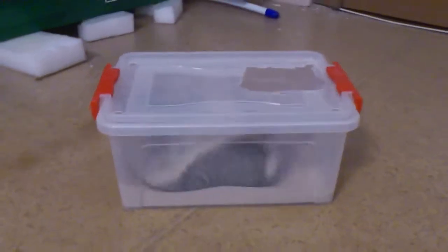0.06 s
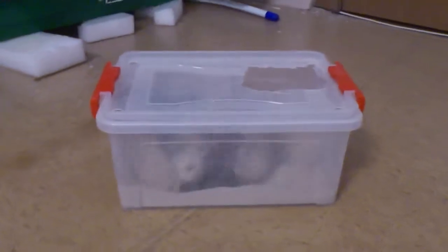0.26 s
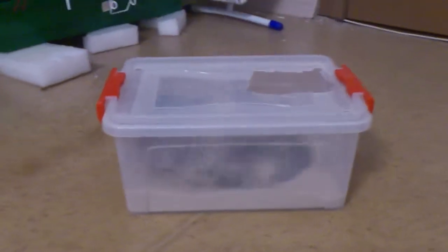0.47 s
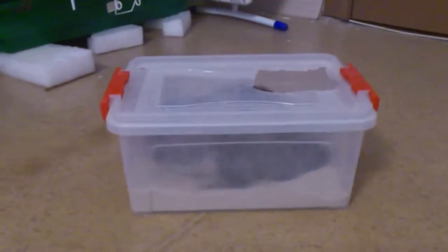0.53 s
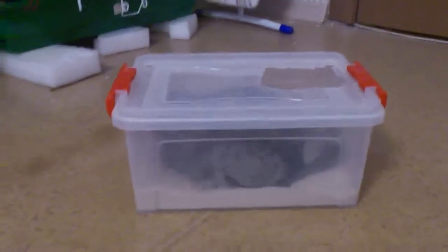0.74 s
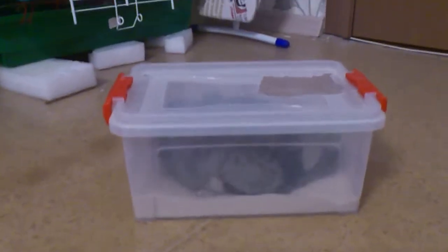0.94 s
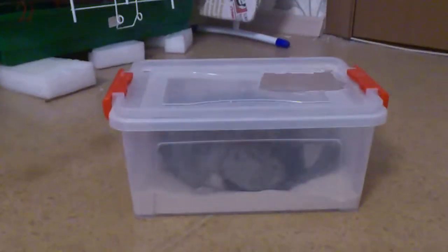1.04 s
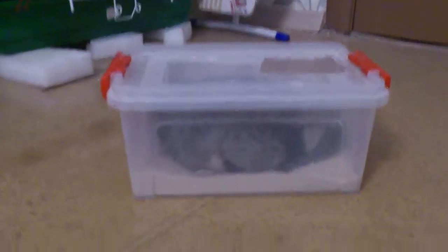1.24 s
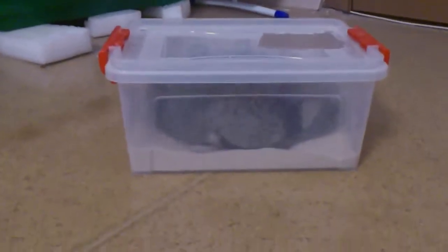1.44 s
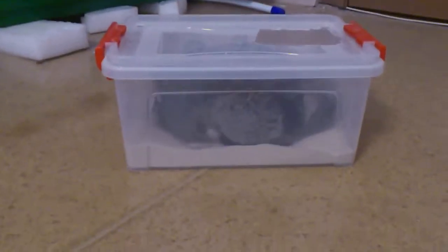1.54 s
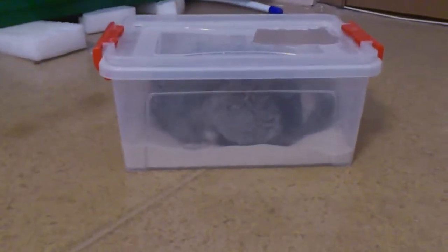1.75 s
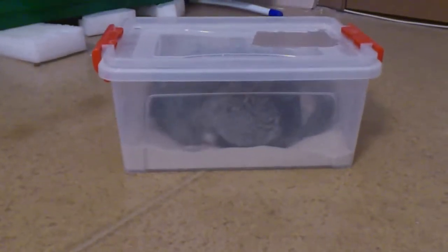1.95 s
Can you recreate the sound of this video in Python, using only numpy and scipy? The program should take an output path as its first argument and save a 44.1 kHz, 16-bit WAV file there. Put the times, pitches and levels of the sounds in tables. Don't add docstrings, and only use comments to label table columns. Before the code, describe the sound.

A small furry animal rolls in fine dust in a lidded plastic box, heard close in a quiet room. From 0 to 0.5 s, steady gritty hiss with quick hollow knocks, thumps and claw taps, strongest at 0.3-0.5. A brief scrape at 0.6, bright sprays near 0.65 and 0.8, near quiet from 1.0 to 1.4, then a softer roll with dull knocks until 1.8, fading to faint hum.

```python
import sys
import numpy as np
from scipy import signal
from scipy.fft import rfft, irfft, next_fast_len
from scipy.io import wavfile
from scipy.ndimage import uniform_filter1d, map_coordinates

SR = 44100
rng = np.random.default_rng(int(sys.argv[2]) if len(sys.argv) > 2 else 0)


def linear_from_db(decibels):
    return 10 ** (np.asarray(decibels, float) / 20)


def waveform_to_disk(signal):
    frames = np.transpose(np.atleast_2d(signal))
    scaled = np.clip(frames, -1, 1) * 32767
    samples = np.round(scaled).astype(np.int16)
    wavfile.write(sys.argv[1], SR, samples)


N = 88200

# time_s, level_db
ROLL_BOUTS = [
    [(0, -47), (.09, -53), (.15, -48.5), (.19, -48.5), (.225, -47.5), (.27, -48.5), (.35, -49),
     (.43, -46.5), (.5, -47.5)],
    [(.55, -40.5), (.595, -43), (.65, -36), (.73, -51.5), (.79, -34), (.855, -55.5), (.875, -52.5),
     (.93, -54.5), (1.0, -69)],
    [(1.3, -69.5), (1.39, -57), (1.44, -43), (1.488, -40.5), (1.535, -45.5), (1.62, -46), (1.70, -54.5),
     (1.76, -51.5), (1.84, -70.5)],
]
# start_s, level_db, hold_s
DUST_FLINGS = [(0.038, -49.5, 0.018), (0.1, -46, 0.006), (0.137, -44.5, 0.061), (0.229, -41, 0.015),
               (0.293, -45, 0.0093), (0.381, -47, 0.01), (0.458, -52, 0.0071), (0.863, -51, 0.018),
               (.913, -51, 0.012), (1.493, -43.5, 0.016), (1.539, -44.5, 0.021), (1.589, -46.5, 0.0095),
               (1.631, -44, 0.013), (1.649, -46, .008), (1.679, -46.5, 0.0063), (1.705, -49.5, .008),
               (1.717, -52.5, 0.038)]
FLING_RISE_S, FLING_T60_S = 0.0027, 0.041
# frequency_hz, level_db (per Hz)
DUST_COLOUR = [(450, -9.5), (1420, -16.5), (2030, -7.5), (4130, 0), (4670, -4.5), (5660, -4.5), (9270, 2.5),
               (12500, -4.5), (15800, -13)]
# centre_hz, width_hz, boost_db
DUST_PEAKS = [(1840, 920, 6.5), (5645, 980, 7), (8860, 2200, 3)]
# frequency_hz, likeness (0 to 1)
DUST_ALIKE = [(600, 1), (1500, 0.53), (3000, 0.082), (8000, 0.018)]
GRAINS_PER_S, GRAIN_SPREAD_DB, GRAIN_SHARE = 7000, 3.5, 0.49
SPLASH_DB, SPLASH_T60_S = -28.5, 0.063
PATCHY_DB = 2.5
FIZZ_HZ, FIZZ_GROWS, FIZZ_FROM_DB = 11000, 0.27, -40.5
DUST_LEFT_DB, BOX_LEFT_DB = 4, -0.9

# start_s, floor_thud_db, wall_knock_db, claw_tap_db,
# struck_wall_hz
BOX_CONTACTS = [(.02, -49.5, -56.5, -67, 330), (0.063, -58, -44.5, -60, 417), (.096, -53, -38, -61, 360),
                (.1045, -51, -37, -42.5, 447), (.122, -49, -44, -59, 95), (0.1564, -41, -50, -38, 900),
                (.192, -44.5, -36.5, -65, 330), (0.2107, -46, -37, -38.5, 400),
                (0.253, -40, -32, -59, 330), (.266, -41.5, -34.5, -58, 795), (.3093, -60, -40, -23, 560),
                (.3108, -40, -36, -14.5, 560), (.315, -39.5, -24.5, -53, 333),
                (.345, -50, -34.5, -46, 566), (0.364, -38, -33, -40, 200), (0.392, -62, -32.5, -32, 963),
                (0.3948, -38, -31.5, -27.5, 435), (.404, -57, -35, -57, 500),
                (.4205, -33, -30, -27, 500), (0.437, -37, -38, -52, 300), (.4728, -60, -40, -25, 500),
                (.4739, -38, -37, -20.5, 380), (.479, -35.5, -29.5, -62, 372),
                (.519, -48, -31, -67, 456), (0.521, -52, -35, -65, 358),
                (.712, -51, -41.5, -57, 112), (.762, -53, -34, -60, 500), (.763, -62, -35.5, -58, 336),
                   (.810, -47, -41, -42.5, 500), (.888, -64, -50, -56, 790), (.665, -58, -44.5, -58, 810),
                   (.985, -54.5, -64, -67, 302), (.916, -49.5, -49.5, -50.5, 280),
                   (1.347, -62, -57, -50.5, 600), (1.471, -52, -48.5, -63, 308), (1.51, -56, -60, -58, 243),
                   (1.541, -43, -39, -43, 330), (1.59, -43.5, -41.5, -53, 288),
                   (1.638, -42.5, -40.5, -48, 398), (1.685, -50, -48, -71, 627),
                   (1.710, -40.5, -42, -47, 404), (1.786, -51.5, -52, -62, 500)]
CONTACTS = BOX_CONTACTS
# pitch_hz, level_db, t60_s
BASE_MODES = [
    (112.8, 0, 0.061),
    (150, 5, 0.072),
    (229, 3.5, 0.054),
]
# pitch_hz, level_db, t60_s
WALL_MODES = [
    (330, -2.5, 0.15),
    (391, 3.5, 0.035),
    (500, 5.5, 0.043),
    (564, -0.5, 0.013),
    (826, 1.5, 0.032),
]
# pitch_hz, level_db, t60_s
LID_MODES = [
    (780, -15, .02),
    (1100, -1, .013),
    (1290, 0, .009),
    (1590, -6, .018),
    (2100, -4, .005),
    (3100, -9, .004),
    (4300, -9, .004),
    (5900, -9, .004),
]
# attack_s for base, walls, lid
PART_ATTACKS = [
    .004,
    .0015,
    .0003,
]
MODE_SCATTER_DB, PITCH_SCATTER = 1.5, .02
STRUCK_T60_S, NEIGHBOURS_DB = 0.045, -11

# time_s, level_db
DRAG_LEVEL = [(0, -55), (.08, -65), (.2, -61), (.33, -45), (.45, -48), (.55, -65), (.665, -49.5),
              (.72, -71), (.8, -51), (.9, -68), (1.05, -84), (1.38, -73), (1.48, -55.5), (1.6, -57.5),
              (1.73, -63), (1.85, -92), (2, -90)]
# start_s, peak_db, centre_hz, t60_s
GRIT_TICKS = [(.012, -43, 2500, .004), (.052, -44, 4000, .008), (.1043, -31, 2500, .003),
              (.120, -42, 2500, .004), (.1563, -29, 4200, .008), (.211, -33, 4500, .005),
              (.310, -26, 5500, .006), (.3955, -36, 3800, .008), (.4732, -31, 3500, .004),
              (.479, -33, 4200, .008), (.607, -34, 3000, .012), (.916, -46, 3000, .008),
              (1.347, -50, 1800, .008), (1.543, -36, 3000, .02), (1.594, -40, 3000, .02),
              (1.637, -37, 2500, .025), (1.655, -40, 3500, .01), (1.688, -39, 3500, .01),
              (1.708, -42, 2500, .015)]
JOLT_S, JOLT_DB, JOLT_HZ, JOLT_T60_S = 1.345, -47.5, 42.4, 0.093
RATTLE_DB, RATTLE_T60_S, RATTLES_PER_S = -31, .3, 700
# time_s, level_db
CLAW_SCRAPE = [
    (0.6, -63),
    (0.612, -42.5),
    (.63, -51),
    (.66, -49),
    (.69, -60),
]
SCRAPE_HZ, SCRAPE_WIDTH_HZ, SCRAPE_LUMPS_DB = 2290, 1230, 4

# frequency_hz, t60_s
ROOM_DECAY = [
    (150, 0.32),
    (1500, 0.27),
    (10000, 0.39),
]
ROOM_DB, DUST_ROOM_DB = -18, -10.5
# frequency_hz, level_db (per Hz)
AIR_COLOUR = [(20, -23), (40, -15), (130, -16), (300, -23), (1000, -28), (5000, -34), (8800, -28.5),
              (15800, -38)]
# frequency_hz, likeness (-1 to 1)
AIR_ALIKE = [(60, 0.74), (380, 0.29), (2380, 0.039), (15000, -0.11)]
AIR_DB = -62.5
# pitch_hz, level_db
MACHINE_HUM = [
    (31.5, -62.5),
    (63, -70),
    (126, -75.5),
    (2300, -82),
    (13830, -84),
]


def dust():
    t = np.arange(N) / SR
    bouts = [point for bout in ROLL_BOUTS for point in bout]
    level = linear_from_db(curve(bouts) + 0.32 * wobble(43.1) + 0.83 * wobble(200))
    for start, _, wall_db, tap_db, _ in CONTACTS:
        splash = linear_from_db(SPLASH_DB - 60 * np.abs(t - start) / SPLASH_T60_S)
        level = level + (t > start) * (linear_from_db(tap_db) + linear_from_db(wall_db)) * splash
    for start, db, hold in DUST_FLINGS:
        rise = np.clip((t - start) / FLING_RISE_S, 0, 1)
        fall_db = 60 * np.maximum(t - start - hold, 0) / FLING_T60_S
        level = np.hypot(level, rise * linear_from_db(db - fall_db))

    chance, sign, size = rng.random((3, 2, N))
    size_db = np.minimum(-GRAIN_SPREAD_DB * np.log(size + 1e-9), 11)
    grains = (chance < GRAINS_PER_S / SR) * np.sign(sign - .5) * linear_from_db(size_db)
    fine = rng.standard_normal((2, N))
    pair = np.sqrt(GRAIN_SHARE) * unit(grains) + np.sqrt(1 - GRAIN_SHARE) * fine

    def colour(hz):
        peaks = sum(db / (1 + (2 * (hz - c) / w) ** 2) for c, w, db in DUST_PEAKS)
        return linear_from_db(along(DUST_COLOUR, hz) + peaks)

    hiss = spread(patchy(pair), colour, DUST_ALIKE)
    fizz = filtered(hiss, lambda hz: 1 / (1 + (FIZZ_HZ / (hz + 1)) ** 8))
    hiss = hiss + fizz * ((level / linear_from_db(FIZZ_FROM_DB)) ** FIZZ_GROWS - 1)
    return level * hiss * pan(DUST_LEFT_DB)


def patchy(x):
    z = signal.stft(x, nperseg=256)[2]
    field = uniform_filter1d(rng.standard_normal(z.shape[1:]), size=3, axis=0)
    field = uniform_filter1d(field, size=6, axis=1)
    return unit(signal.istft(z * linear_from_db(PATCHY_DB * unit(field)), nperseg=256)[1][:, :N])


def knocks():
    out = np.zeros((2, N + SR))
    t = np.arange(SR // 4) / SR
    for start, base_db, wall_db, tap_db, struck_hz in CONTACTS:
        neighbours = [(hz, db + NEIGHBOURS_DB, t60) for hz, db, t60 in WALL_MODES]
        walls = [(struck_hz, 0, STRUCK_T60_S)] + neighbours
        parts = zip((BASE_MODES, walls, LID_MODES), (base_db, wall_db, tap_db), PART_ATTACKS)
        for modes, part_db, attack in parts:
            for hz, mode_db, t60 in modes:
                louder, sharper, side = rng.standard_normal(3)
                lean = np.array([[0.35 * side - 1], [1 - 0.87 * side]]) * np.clip(hz / 4000, 0, .4)
                ring = np.sin(2 * np.pi * hz * (1 + PITCH_SCATTER * sharper) * t + lean)
                ring = ring * (1 - np.exp(-t / attack))
                level_db = part_db + mode_db + MODE_SCATTER_DB * louder - 60 * t / t60
                out[:, round(start * SR):][:, :len(t)] -= linear_from_db(level_db) * ring
    return out[:, :N]


def drag():
    lumps = rng.standard_normal((2, N)) * linear_from_db(9.7 * np.tanh(wobble(110)))
    box = resonances(BASE_MODES[:2] + WALL_MODES + LID_MODES[:4])
    rub = spread(lumps, box, [(100, 1.0), (600, 0.99), (1500, 0.23)])
    return linear_from_db(curve(DRAG_LEVEL)) * rub


def ticks():
    out = np.zeros((2, N + SR))
    t = np.arange(2048) / SR
    f = np.fft.rfftfreq(len(t), 1 / SR)
    for start, db, hz, t60 in GRIT_TICKS:
        burst = rng.standard_normal((2, len(t))) * linear_from_db(-60 * t / t60) * (1 - np.exp(-t / .0005))
        burst = burst + .5 * burst[::-1]
        colour = 1j * f * hz * 0.99 / (hz * hz - f * f + 1j * f * hz * 1.28)
        tick = irfft(rfft(burst) * colour ** 2)
        tick = tick / np.abs(tick.mean(0)).max()
        out[:, round(start * SR):][:, :len(t)] += linear_from_db(db + np.array([[2], [-2]])) * tick
    after = np.maximum(np.arange(N) / SR - JOLT_S, 0)
    jolt = linear_from_db(JOLT_DB - 60 * after / JOLT_T60_S) * np.sin(2 * np.pi * JOLT_HZ * after)
    return out[:, :N] + jolt


def rattle():
    t = np.arange(N) / SR
    level = 0
    for start, _, _, tap_db, _ in CONTACTS:
        fading = linear_from_db(tap_db + RATTLE_DB - 60 * np.abs(t - start) / RATTLE_T60_S)
        level = level + (t > start + .004) * fading
    chance, force = rng.random((2, N))
    rebounds = (chance < RATTLES_PER_S / SR) * (2 * force - 1)
    response = resonances(WALL_MODES[1:] + LID_MODES[:5])
    return filtered(rebounds * level, response) / np.std(filtered(rebounds, response))


def scrape():
    lumps = rng.standard_normal((2, N)) * linear_from_db(SCRAPE_LUMPS_DB * np.tanh(wobble(220)))
    band = lambda hz: 1 / (1 + ((hz - SCRAPE_HZ) / SCRAPE_WIDTH_HZ * 2) ** 4)
    level = linear_from_db(curve([(0, -120)] + CLAW_SCRAPE + [(1, -120)]))
    return spread(lumps, band, DUST_ALIKE) * level


def room(x):
    hz, t, z = signal.stft(rng.standard_normal((2, SR // 2)), SR, nperseg=256)
    z = z + z.mean(0) * 3 * (hz < 900)[:, None]
    decay = linear_from_db(-60 * t / along(ROOM_DECAY, hz)[:, None])
    tail = signal.istft(z * decay, SR, nperseg=256)[1]
    late = np.pad(x, ((0, 0), (200, 0)))
    return signal.fftconvolve(late, tail / np.linalg.norm(tail[0]), axes=1)[:, :N]


def air():
    t = np.arange(N) / SR
    hum = 0
    for hz, db in MACHINE_HUM:
        level = linear_from_db(db + 0.5 + 1.5 * wobble(17.0))
        hum = hum + level * np.sin(2 * np.pi * hz * t + .5 * wobble(3.56))
    hiss = spread(rng.standard_normal((2, N)), lambda hz: linear_from_db(along(AIR_COLOUR, hz)), AIR_ALIKE)
    return hum + linear_from_db(AIR_DB) * hiss


def resonances(modes):
    def response(f):
        total = 0
        for k, (hz, db, t60) in enumerate(modes):
            damping = 1j * f * 3 / t60
            total = total + (-1) ** k * linear_from_db(db) * damping / (hz * hz - f * f + damping)
        return total
    return response


def spread(pair, gain, alike):
    turn = lambda hz: np.arccos(np.clip(along(alike, hz), -1, 1)) / 2
    mid, side = filtered(pair, lambda hz: gain(hz) * np.array([np.cos(turn(hz)), np.sin(turn(hz))]))
    return unit(np.array([mid + side, mid - side]))


def pan(left_db):
    return linear_from_db(np.array([[.5], [-.5]]) * left_db)


def filtered(x, response):
    m = next_fast_len(N + SR // 2)
    return irfft(rfft(x, m) * response(np.fft.rfftfreq(m, 1 / SR)), m)[..., :N]


def unit(x):
    return x / np.sqrt(np.mean(x ** 2) + 1e-20)


def along(points, hz):
    f, v = np.transpose(points)
    return np.interp(np.log(hz + 1), np.log(f + 1), v)


def curve(rows):
    s, v = np.transpose(sorted(rows))
    return np.interp(np.arange(N) / SR, s, v)


def wobble(rate):
    knots = rng.standard_normal(int(N * rate / SR) + 4)
    return map_coordinates(knots, [np.arange(N) * rate / SR])


def scene():
    hiss = dust()
    box = (knocks() + drag() + ticks() + rattle() + scrape()) * pan(BOX_LEFT_DB)
    answer = room(linear_from_db(ROOM_DB) * box + linear_from_db(DUST_ROOM_DB) * hiss)
    return box + hiss + answer + air()


def roll_off(x):
    return signal.sosfilt(signal.butter(12, 16190, fs=SR, output="sos"), x)


def record(dry):
    mix = filtered(dry, lambda hz: hz < 15830)
    return roll_off(mix)


dry = scene()
out = record(dry)
waveform_to_disk(out)
```